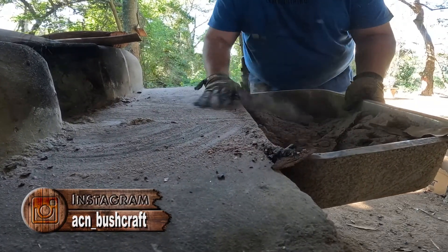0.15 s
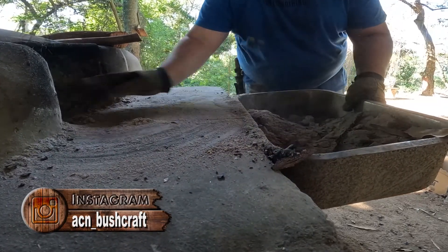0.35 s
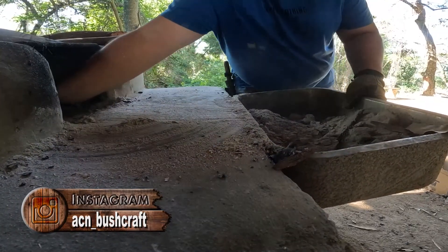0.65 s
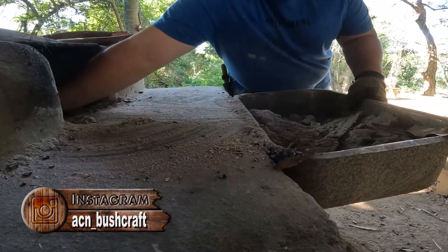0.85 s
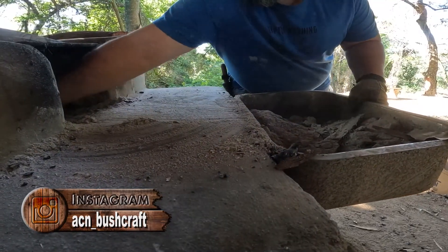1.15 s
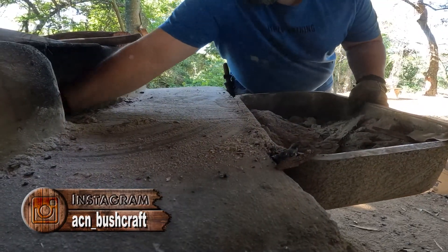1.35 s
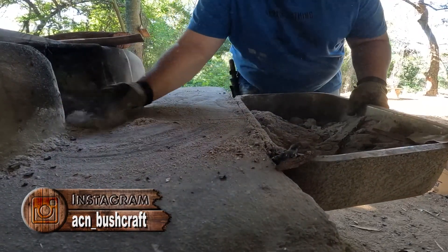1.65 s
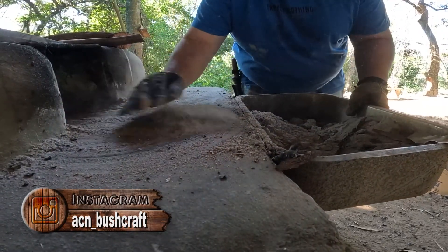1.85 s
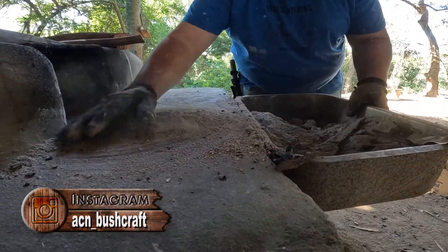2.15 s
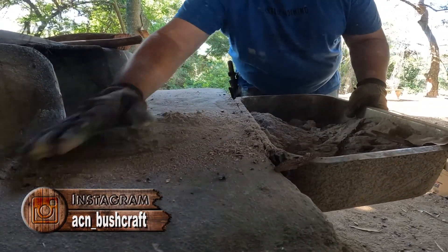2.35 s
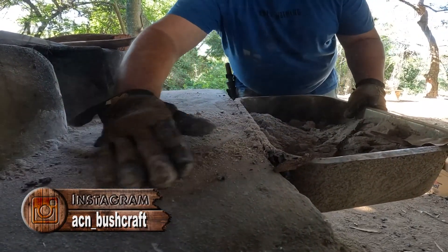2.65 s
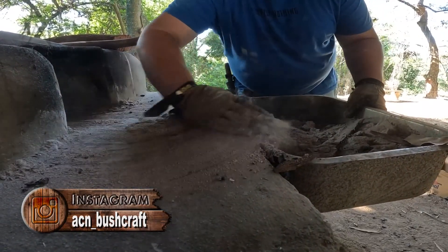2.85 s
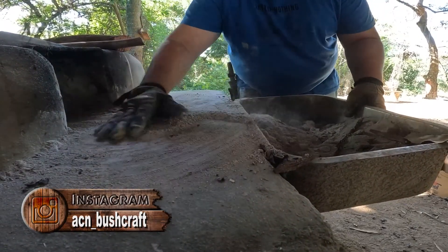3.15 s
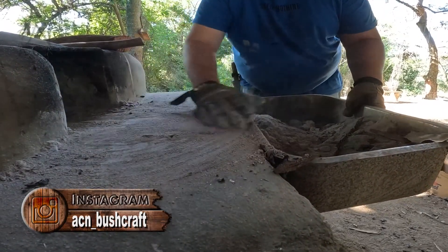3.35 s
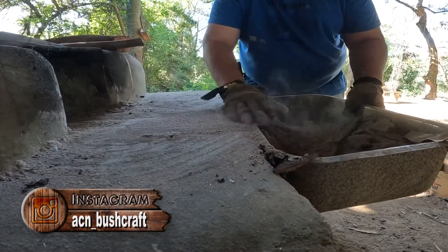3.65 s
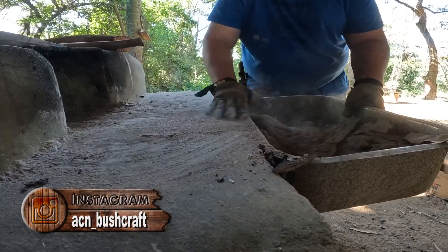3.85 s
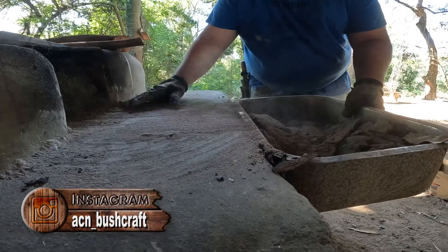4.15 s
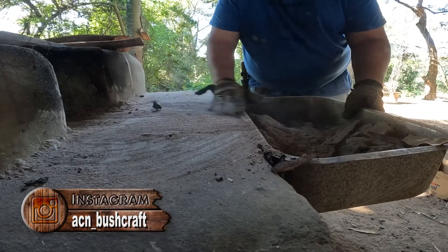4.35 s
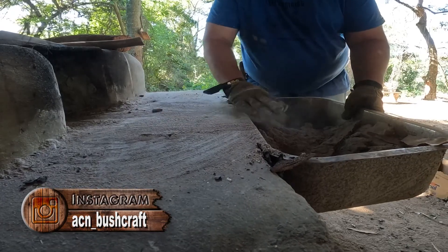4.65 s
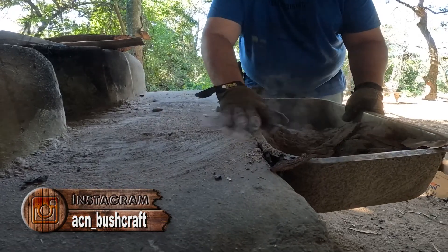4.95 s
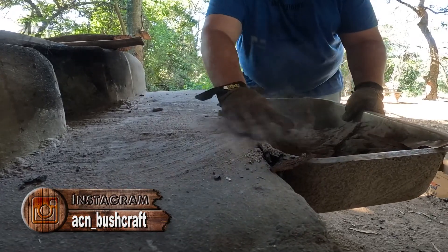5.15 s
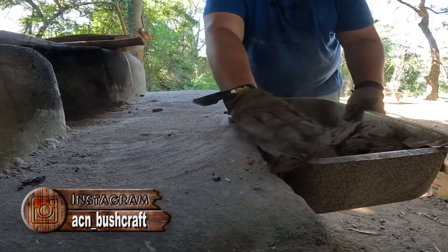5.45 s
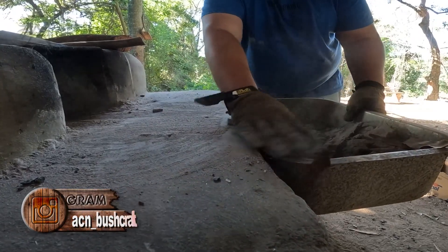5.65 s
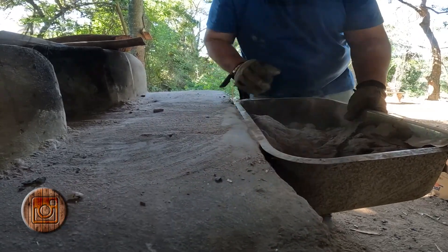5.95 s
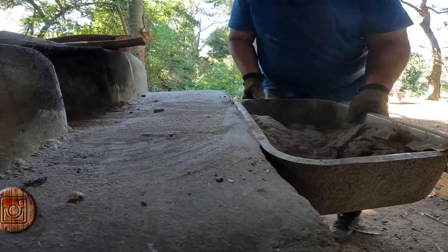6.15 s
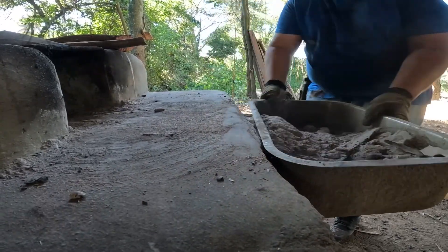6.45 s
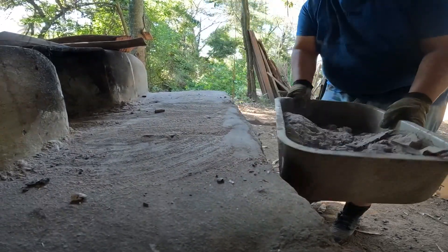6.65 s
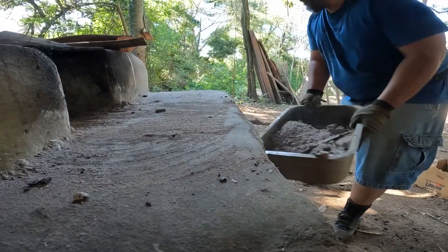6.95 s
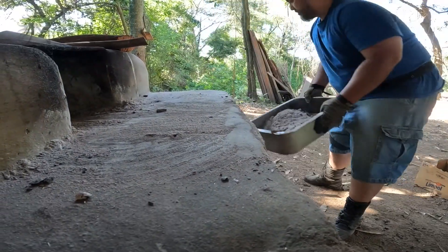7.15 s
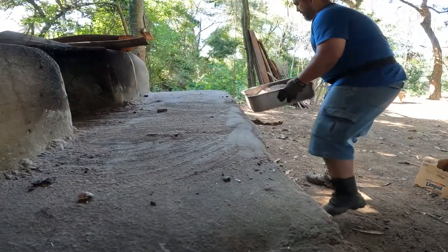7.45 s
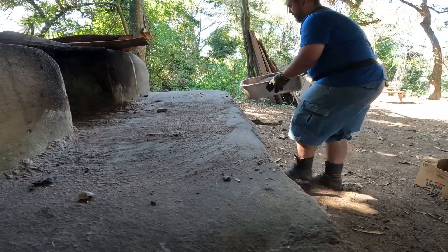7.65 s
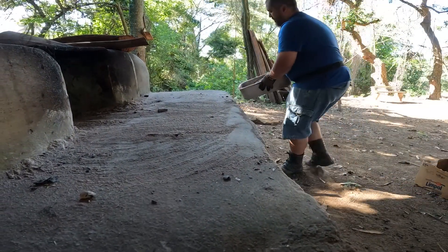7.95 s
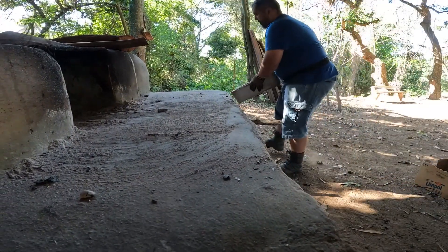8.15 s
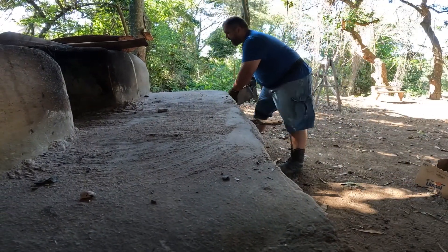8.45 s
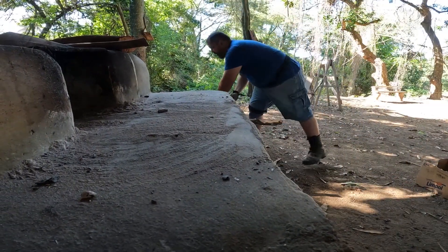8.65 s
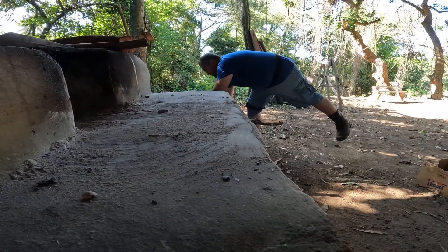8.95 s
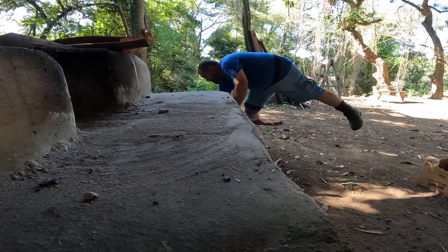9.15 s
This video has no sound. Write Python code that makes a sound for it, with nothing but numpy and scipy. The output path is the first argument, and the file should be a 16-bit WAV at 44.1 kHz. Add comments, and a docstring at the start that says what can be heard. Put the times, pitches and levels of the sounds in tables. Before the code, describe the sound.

Short dry rubs and crackling charcoal crumbs on a hearth, a low tray grind, faint footsteps on dirt, and a final crunchy thump.

```python
"""A gloved hand sweeps gritty ash across a hearth slab and scrapes more out of a clay stove, into a metal tray.
The tray drags off the slab with a rumble, is carried over crunching dirt and is set down with a thump.
Rubs are tiny random slips over a hiss; crumbs are short noise bursts; metal and thumps are fading tones.
Behind them are a low air rumble, leaves and a thin insect tone, made of filtered noise."""
import sys
import numpy as np
from scipy import signal
from scipy.fft import rfft, irfft, next_fast_len
from scipy.io import wavfile
from scipy.ndimage import uniform_filter1d, map_coordinates

SR = 44100
rng = np.random.default_rng(int(sys.argv[2]) if len(sys.argv) > 2 else 0)


def log_audio(samples):
    """Write samples as a 16-bit WAV file to the path given in sys.argv[1]."""
    # one column per channel
    frames = np.atleast_2d(samples).T
    # limit to full scale, then quantise
    limited = np.clip(frames, -1, 1)
    pcm = np.round(limited * 32767).astype(np.int16)
    wavfile.write(sys.argv[1], SR, pcm)


N = 410571

# sweeps over the slab: (time [s], rise [s], slide [s], sag [dB], friction [dB], hiss [dB], tray boom [dB],
# flat-hand resonance [Hz], flattest after [s])
SWEEP_STROKES = [ (0.018, 0.016, 0.061, 9, -21, -28, -64, 2230, .04),
                 (0.23, 0.019, 0.038, 9, -23.5, -26.5, -64, 2120, 0.03),
                 (1.754, 0.05, 0.085, 0, -22.5, -28.5, -52.5, 1820, 0.17),
                 (2.06, 0.047, 0.031, 0, -26, -31.5, -62, 1480, 0.0068),
                 (2.265, 0.034, 0.047, 0.5, -30, -34, -63, 1490, 0.08),
                 (2.48, 0.038, 0.099, 0, -23, -24.5, -55, 2080, .085),
                 (2.694, 0.0076, 0.045, 1.5, -39, -37.5, -70, 1650, .02),
                 (2.746, 0.015, 0.23, 9.5, -22, -24, -66, 1710, 0.077),
                 (3.236, 0.034, 0.073, 1, -28, -30.5, -61, 1350, .06),
                 (3.34, 0.034, 0.19, 8.5, -25, -26, -58, 2230, .06),
                 (3.729, 0.023, .06, 5.5, -30, -33, -47, 1590, 0.0063),
                 (3.954, 0.012, 0.067, 7, -22.5, -28, -40.5, 1830, 0.0061),
                 (4.255, 0.095, 0.052, -2.5, -33.5, -38.5, -79, 1500, 0.11),
                 (4.401, .008, 0.081, 7, -21.5, -27, -66, 2200, 0.024),
                 (4.48, 0.027, 0.069, -7, -42.5, -48, -52, 1420, .06),
                 (4.683, 0.0056, 0.053, 6, -25, -29, -44, 1600, 0.01),
                 (4.849, 0.013, 0.054, 5, -32.5, -35.5, -34.5, 1600, 0.025),
                 (4.97, 0.033, 0.011, -1, -51, -57, -51, 1370, .02),
                 (5.037, 0.0064, 0.023, 5.5, -30, -33.5, -36, 1330, .02),
                 (5.071, 0.0041, 0.035, 12.5, -25.5, -26.5, -38.5, 1300, 0.024),
                 (5.229, 0.026, 0.033, 7.5, -24, -28.5, -43, 1900, 0.012),
                 (5.43, 0.0097, 0.054, 2.5, -27, -29.5, -40.5, 1780, 0.0082),
                 (5.606, .02, 0.054, 3, -32.5, -35, -39, 1560, .01),
                 (5.789, 0.02, 0.028, -1.5, -32.5, -34, -46, 2400, 0.023), ]
# pulls inside the firebox: (time [s], rise [s], slide [s], sag [dB], friction [dB], hiss [dB], cavity boom [dB])
PULL_STROKES = [(0.478, 0.012, 0.4, 10, -31.5, -49, -48), (0.82, 0.075, 0.078, -0.5, -35, -48, -40),
                (0.95, 0.051, 0.099, 0, -37, -45.5, -37.5), (1.28, 0.057, .44, -4.5, -36.5, -45, -41)]
# the tray's rim grinding off the slab, then shifting in the hands:
# (time [s], rise [s], slide [s], sag [dB], grit [dB], tray boom [dB])
GRIND_STROKES = [(5.71, 0.087, .25, 1, -54, -34.5), (6.05, 0.062, 0.21, -4, -53.5, -34),
                 (6.149, 0.014, .012, 9, -40, -48), (6.232, .016, 0.061, 3.5, -37, -35),
                 (6.33, .026, .014, -5, -35.5, -36), (6.38, 0.0026, 0.045, -1, -21.5, -26),
                 (6.44, 0.061, 0.021, 5.5, -27.5, -28.5), (6.675, 0.022, 0.32, 9.5, -48.5, -51.5)]
# soles and clothes scuffing on the walk, then the tray settling in the dirt:
# (time [s], rise [s], slide [s], sag [dB], crunch [dB], swish [dB])
SCUFF_STROKES = [(7.04, 0.016, 0.25, 13, -64, -62.5), (7.45, 0.022, 0.16, 0.5, -57.5, -69),
                 (7.74, .012, .015, 4, -55, -74), (7.842, 0.012, .02, 3.5, -45, -51),
                 (7.973, 0.0086, 0.032, 2.5, -41.5, -57), (8.0, 0.058, 0.34, 17.5, -56.5, -51.5),
                 (8.42, 0.0075, .24, 1.5, -56, -62.5), (8.7, 0.13, .06, -2, -61.5, -60),
                 (8.885, 0.031, 0.17, 3.5, -46, -56.5), (9.158, 0.013, .02, 4, -38, -43),
                 (9.192, 0.014, .03, 10.5, -26, -33.5)]
# larger crumbs of charcoal cracking: (time [s], level [dB], pitch [Hz], spray of fragments [dB relative to snap])
LARGE_CRUMBS = [(0.028, -21, 1960, -11), (0.167, -38, 4400, -13), (0.227, -14.5, 1730, -25),
                (0.25, -15, 2000, -13), (0.36, -33.5, 1400, -25), (0.512, -14.5, 1690, -6),
                (0.607, -18, 1420, -2), (1.499, -16, 1400, 1), (1.575, -7.5, 1360, -14),
                (1.779, -16, 1230, -15), (1.929, -25.5, 2960, 2), (1.959, -30, 4700, -3),
                (1.982, -38.5, 2919, 0), (2.06, -23.5, 2200, -24), (2.292, -11.5, 1070, -11),
                (2.482, -26, 1550, -16), (2.506, -7, 1326, -4), (2.706, -21, 1870, -11),
                (3.112, -45, 1180, -11), (4.2, -41, 1690, -24), (4.407, -18, 2110, -15),
                (4.568, -14.5, 1490, -19), (4.715, -8.5, 1410, -10), (4.851, -7.5, 1630, -17),
                (5.076, -15, 1118, -13), (5.232, -8.5, 1614, -23), (5.258, -17, 2420, -7),
                (5.477, -10, 1400, -3), (5.535, -19, 1530, -4), (5.778, -15, 1376, -1),
                (6.034, -28, 2500, -20.5), (6.358, -10.5, 4630, 13), (6.382, -13, 1150, -16),
                (6.501, -11, 2230, -15), (6.586, -24, 1400, -4), (6.715, -31, 1010, 5),
                (6.776, -42, 1500, -8), (6.805, -23, 1170, -2), (6.911, -32.5, 1470, -9),
                (7.456, -30.5, 1260, -9), (7.55, -35, 1400, -8), (7.632, -41, 1400, -10),
                (7.861, -32, 1200, -20), (7.986, -32, 1090, -17), (8.079, -32, 1500, -10),
                (8.525, -34, 1820, -12)]
# hard knocks on the tray's rim: (time [s], level [dB])
RIM_KNOCKS = [(3.533, -10.5), (5.736, -16), (5.896, -34.5), (6.586, -27), (6.775, -28)]
# the tray's drops and the footfalls: (time [s], level [dB], base pitch [Hz])
SOFT_THUMPS = [(3.54, -32.5, 196), (3.794, -28, 212), (4.024, -27.5, 511), (4.862, -22, 139),
               (6.421, -9, 134), (6.585, -28.5, 514), (6.743, -24, 169), (7.471, -28.5, 216),
               (7.858, -26.5, 137), (7.994, -31.5, 205), (8.433, -36, 150), (8.526, -35.5, 188),
               (8.929, -32.5, 209), (9.161, -12, 192), (9.201, -13.5, 121)]

# how the support of the tray changes its floor: (time [s], lowest mode [Hz], second mode [dB relative to lowest])
TRAY_FLOOR_PITCH = [(3.8, 166, -3), (4.9, 140, -4), (5.75, 142, -8.5), (5.97, 163, -13),
                    (6.04, 140.5, -10.5), (6.12, 143, 3), (6.33, 146.7, -3), (6.43, 134.2, -5.5),
                    (6.6, 139.7, -6), (6.8, 166.2, 1)]
# ringing of the tray's wall: (pitch [Hz], width [Hz], level [relative dB])
TRAY_WALL_MODES = [(337, 22, -12.5), (468.5, 32, 3.5)]
# how freely rubs and knocks reach the wall: (time [s], share [0 to 1])
WALL_TOUCH = [(3.4, 1), (3.55, 1), (6.85, 1), (7, 0.32), (9.1, 0), (9.15, 0.24)]
# ringing of the tray's rim: (pitch [Hz], level [relative dB], time to fall 60 dB [s])
TRAY_RIM_MODES = [(990, -2.5, 0.099), (1174, 10, 0.024), (1200, 2, 0.056), (1560, -2, 0.043)]
# tones in a thump: (times the base pitch [ratio], level [relative dB])
THUMP_MODES = [(.74, -9.5), (1.01, 2.5), (1.7, -4.5)]

# colour of grit on the slab: (frequency [Hz], level [relative dB])
SLAB_COLOUR = [(88, -62), (150, -15.5), (350, -14.5), (480, -11), (750, -5), (1000, 2), (1500, 1.5),
               (2300, -6.5), (3000, 1), (3600, -4), (4700, -2.5), (7300, -9), (9000, -18.5), (12000, -20),
               (14600, -36)]
# colour of scraping in the firebox: (frequency [Hz], level [relative dB])
FIREBOX_COLOUR = [(53, -48), (90, -15), (144, -5), (245, -3), (310, -17), (367, -5.5), (575, -6.5),
                  (979, -3.5), (1700, -6.5), (3440, -14), (4260, -14), (7410, -19.5), (12100, -39),
                  (14600, -49)]
# colour of the grinding rim: (frequency [Hz], level [relative dB])
RIM_COLOUR = [(240, -21), (400, -3), (465, -2.5), (648, -3.5), (824, -4), (1260, 2), (1700, -2), (2300, 1),
              (4010, -6), (5260, -2), (8260, -13.5), (12000, -19.5), (14600, -34)]
# colour of crunching dirt: (frequency [Hz], level [relative dB])
DIRT_COLOUR = [(150, -3), (300, -4.5), (500, -12), (720, -21.5), (950, -3.5), (1400, -5.5), (2200, -8.5),
               (3400, -10.5), (5500, -8), (7500, -14.5), (9000, -24.5), (12000, -22), (14000, -38)]
# colour of the noise in the tray's boom: (frequency [Hz], level [relative dB])
BOOM_COLOUR = [(35, -25), (70, -4), (120, 0.5), (160, -2.5), (230, -1), (290, -7), (370, -21.5), (550, -35),
               (920, -94)]
# colour of the air rumble: (frequency [Hz], level [relative dB])
AIR_COLOUR = [(15, -10), (22, -1), (45, 0), (58, -3), (75, -17.5), (110, -17.5), (180, -20), (350, -26),
              (700, -45), (1500, -90)]
# colour of the leaves: (frequency [Hz], level [relative dB])
LEAF_COLOUR = [(350, -23), (600, -8), (856, -17.5), (1190, -5), (1630, -8), (2070, -10), (2770, -15.5),
               (4330, -15), (9060, -27.5), (12100, -30.5), (14000, -54.5)]
# colour of the air under the palm: (frequency [Hz], level [relative dB])
PALM_COLOUR = [(600, -6), (1000, 0.5), (2500, 3), (3600, -6), (8000, -33)]
# body left in the rub at each palm pitch: (hollow pitch [Hz], level [relative dB])
BODY_BY_PITCH = [(1350, 0.0), (1650, -5.0), (2000, -1.5)]
# how much of the rub is the palm's hollow tone: (hollow pitch [Hz], share of power [0 to 1])
HOLLOW_SHARE = [(1300, 0.2), (1700, 0.4), (2050, 0.79)]

# where the work is: (time [s], left minus right above the bass [dB])
LEFT_LEAN = [(0, 0.3), (.7, 1.5), (1.7, 1), (2.2, 3), (2.8, 0.4), (3.3, 2), (3.8, -0.7), (4.4, 0.3),
             (5.3, -2), (6.4, -1.5), (7.5, -2.5), (9.3, 1.5)]
# how alike left and right are, for close sounds: (frequency [Hz], likeness [0 to 1])
CLOSE_ALIKE = [(150, 0.98), (1000, 0.92), (4000, 0.81), (8000, 0.94), (12000, 0.6)]
# the same for the air, then for the leaves: (frequency [Hz], likeness [0 to 1])
AIR_ALIKE = [(30, 0.67), (100, 0.74)]
LEAF_ALIKE = [(1000, 0.51), (8000, 0.6)]
# fading of the echo under the roof: (frequency [Hz], time to fall 60 dB [s])
SHELTER_FADE = [(150, 0.8), (1500, 0.2), (6000, 0.15), (13000, 0.05)]
# low rumble of the open air, before its random wobble: (time [s], level [dB])
AIR_LEVEL = [(0, -45), (1, -47.5), (2.8, -51), (4.7, -52.5), (6.3, -49.5), (7.5, -47.5), (8.3, -52),
             (9.3, -48.5)]
# rustle of the leaves, before its random wobble: (time [s], level [dB])
LEAF_LEVEL = [(0, -60), (4.2, -62.5), (5.5, -58), (9.3, -61)]
# lift of the left treble, matched by an equal cut on the right: (frequency [Hz], lift [dB])
LEFT_TREBLE = [(4000, 0.04), (8000, 1.0)]

TOP_HZ = 14500
TOUCH_DB = 18  # every rub starts this far under its full pressure
SAG_POWER = 1.34  # pressure holds at first and sags towards the end of the slide
# fall after the hand lifts: friction, hiss, tray boom
LIFT_DB_PER_S, POWDER_DB_PER_S, TRAY_DB_PER_S = 601, 703, 180
# fall after a pull, a grind, a scuff
FIREBOX_DB_PER_S, GRIND_DB_PER_S, DIRT_DB_PER_S = 264, 454, 223
CUPPED_HZ = 1255  # hollow under a cupped hand
FLAT_S, FLAT_SHARE = 0.054, 0.31  # width of the flat moment: a fixed time plus a share of the slide
# small crumbs: how many, level against the rubbing, random spread each way, middle pitch
CRUMBS_PER_S, CRUMB_DB, CRUMB_SPREAD_DB, CRUMB_HZ = 28, 1, 4, 1900
SECOND_MODE = 1.45  # times the tray floor's lowest mode


def sweeps():
    """The glove rubs grit over the slab; the hollow under the palm rings higher and clearer as the hand flattens."""
    gain, hiss_gain = strokes(SWEEP_STROKES, [LIFT_DB_PER_S, POWDER_DB_PER_S])
    hollow_hz = hollow_pitch()
    low, hiss = split(grit(SLAB_COLOUR, rate=3200, powder_db=0, clump_db=1.67), 2920)
    body, rasp = split(unit(low), 1060)
    rasp = rasp + amp(along(BODY_BY_PITCH, hollow_hz)) * body
    # the rasp bounces between glove and slab
    rasp = echoed(rasp, 2 / np.maximum(hollow_hz, 1000), reflect=0.19)
    hollow = unit(palm(noise(PALM_COLOUR, CLOSE_ALIKE), hollow_hz, width_hz=450))
    share = np.clip(along(HOLLOW_SHARE, hollow_hz), 0, 1)
    rub = np.sqrt(1 - share) * rasp + np.sqrt(share) * hollow
    return shifting(gain * rub + hiss_gain * unit(hiss), depth_db=2.5)


def hollow_pitch():
    """The hollow under the palm rises in pitch as the hand flattens, once in each sweep."""
    t = np.linspace(0, N / SR, N // 100)
    hz = np.full(len(t), float(CUPPED_HZ))
    for s, _, slide_s, *_, flat_hz, after_s in SWEEP_STROKES:
        flatness = np.exp(-((t - s - after_s) / (FLAT_S + FLAT_SHARE * slide_s)) ** 2)
        hz = np.where(t < s, hz, CUPPED_HZ + (flat_hz - CUPPED_HZ) * flatness)
    return np.interp(np.arange(N) / SR, t, uniform_filter1d(hz, size=4))


def palm(x, hz, width_hz):
    """A moving air resonance: cross-fade between neighbouring fixed ones."""
    centres = np.geomspace(900, 2900, 7)
    place = np.interp(hz, centres, np.arange(len(centres)))
    out = 0
    for k, centre in enumerate(centres):
        nearness = np.maximum(1 - abs(place - k), 0)
        out = out + nearness * signal.lfilter(*signal.iirpeak(centre, centre / width_hz, SR), x)
    return out


def pulls():
    """Deep in the firebox the scraping is dull and uneven, and the cavity booms."""
    low, hiss = split(grit(FIREBOX_COLOUR, rate=1500, powder_db=2.0, clump_db=1.3), 2630)
    boom, rasp = split(low, 940)
    rasp_gain, hiss_gain, boom_gain = strokes(PULL_STROKES, [FIREBOX_DB_PER_S] * 3)
    scrape = rasp_gain * unit(rasp) + hiss_gain * unit(hiss) + boom_gain * unit(boom)
    return shifting(amp(1.05 * wobble(55)) * scrape, depth_db=2.2)


def crumbs():
    """Each crumb breaks with a sharp snap and a short spray of fragments."""
    out, t = np.zeros(N), np.arange(SR // 12) / SR
    for s, db, hz, spray_db in LARGE_CRUMBS + small_crumbs():
        fade = amp(-60 * t / 0.0086) + amp(spray_db - 60 * t / 0.081)
        burst = rng.standard_normal(len(t)) * fade
        band = [hz * 0.64, min(hz * 1.53, SR / 3)]
        snap = signal.lfilter(*signal.butter(1, band, "band", fs=SR), burst)
        add(out, s, amp(db - 4.0) * snap / abs(snap).max())
    return signal.lfilter(*signal.butter(2, [600, 8000], "band", fs=SR), out)


def small_crumbs():
    """Small crumbs break at random under glove, rim and soles, louder with harder rubbing: rows like LARGE_CRUMBS."""
    rubbing = strokes(SWEEP_STROKES, [LIFT_DB_PER_S])[0]
    rubbing = rubbing + strokes(PULL_STROKES + GRIND_STROKES + SCUFF_STROKES, [DIRT_DB_PER_S])[0]
    rows = []
    for when, size, pitch in rng.random((int(CRUMBS_PER_S * N / SR), 3)):
        rubbing_db = 20 * np.log10(rubbing[int(when * N)] + 1e-6)
        db = rubbing_db + CRUMB_DB + CRUMB_SPREAD_DB * (2 * size - 1)
        hz = CRUMB_HZ * 2 ** (2 * pitch - 1)  # up to an octave either way
        rows.append((when * N / SR, db, hz, -16))
    return rows


def tray():
    """The ash-damped tray floor judders around its two lowest modes, shaken by the hand and its grinding rim."""
    hz, second_db = curves(TRAY_FLOOR_PITCH)
    phase = 2 * np.pi * np.cumsum(hz) / SR
    mode = lambda p: wobble(38) * np.cos(p) + wobble(38) * np.sin(p)
    judder = unit(mode(phase) + amp(second_db) * mode(SECOND_MODE * phase))
    brushed = strokes(SWEEP_STROKES, [LIFT_DB_PER_S, POWDER_DB_PER_S, TRAY_DB_PER_S])[-1]
    grinding, dragged = strokes(GRIND_STROKES, [GRIND_DB_PER_S, TRAY_DB_PER_S])
    shaking = np.hypot(brushed, dragged)
    boom = shaking * (amp(-2.0) * judder + amp(-5) * noise(BOOM_COLOUR, CLOSE_ALIKE))
    return boom + grinding * grit(RIM_COLOUR, rate=1100, powder_db=3, clump_db=2.05)


def clinks():
    """A gritty knock sets the tray's rim ringing briefly."""
    out, t = np.zeros(N), np.arange(SR // 5) / SR
    for s, db in RIM_KNOCKS:
        ring = 0
        for hz, mode_db, t60 in TRAY_RIM_MODES:
            ring = ring + amp(mode_db + rng.normal(0, 2.1) - 60 * t / t60) * np.sin(2 * np.pi * hz * t)
        crunch_filter = signal.butter(1, [700, 2500], "band", fs=SR)
        crunch = signal.lfilter(*crunch_filter, rng.standard_normal(len(t)))
        knock = ring + amp(-7.5 - 60 * t / 0.26) * crunch
        add(out, s, amp(db - 8) * knock * (1 - np.exp(-t / 0.0035)))
    return out


def wall(x):
    """The tray's wall rings while it rests on the slab, less and less once lifted, and again when it lands."""
    touching = curves(WALL_TOUCH)[0]
    ringing = lambda f: sum(amp(db + 7) * resonance(f, hz, width) for hz, width, db in TRAY_WALL_MODES)
    return filtered(x * touching, ringing)


def thumps():
    """Heavy soft contacts: a few strongly damped low modes and a dull rattle."""
    out, t = np.zeros(N), np.arange(SR // 3) / SR
    for s, db, hz in SOFT_THUMPS:
        body = 0
        for ratio, mode_db in THUMP_MODES:
            mode_hz = hz * ratio * rng.normal(1, 0.02)
            body = body + amp(mode_db) * np.sin(2 * np.pi * mode_hz * t)
        rattle_filter = signal.butter(2, [hz * 0.83, hz * 4], "band", fs=SR)
        rattle = unit(signal.lfilter(*rattle_filter, rng.standard_normal(len(t))))
        thud = body * amp(-60 * t / 0.12) + amp(-14 - 60 * t / 0.35) * rattle
        thud = thud * (1 - np.exp(-t / 0.003))  # soft start
        add(out, s, amp(db - 6.5) * thud / abs(thud).max())
    return out


def scuffs():
    """Dry dirt crunches under the soles and the landing tray; dust and cloth swish above it."""
    crunch, swish = split(grit(DIRT_COLOUR, rate=500, powder_db=1.5, clump_db=0.7), 2780)
    crunch_gain, swish_gain = strokes(SCUFF_STROKES, [DIRT_DB_PER_S] * 2)
    return crunch_gain * unit(crunch) + swish_gain * unit(swish)


def shelter(x):
    """The roof and stove walls answer with a short weak tail of fading noise."""
    hz, t, z = signal.stft(rng.standard_normal((2, SR // 2)), SR, nperseg=256)
    fade = amp(-60 * t / along(SHELTER_FADE, hz)[:, None])
    tail = signal.istft(z * fade, SR, nperseg=256)[1]
    tail = np.pad(tail, ((0, 0), (SR // 250, 0)))  # the answer comes 4 ms late
    return signal.fftconvolve(x.mean(axis=0)[None], tail / np.linalg.norm(tail[0]), axes=1)[:, :N]


def outdoors():
    """Low moving air and leaves are wavering coloured noise; the insect chorus is noise in a narrow band."""
    air = amp(curves(AIR_LEVEL)[0] + 2.1 * wobble(8.4)) * noise(AIR_COLOUR, AIR_ALIKE)
    leaves = amp(curves(LEAF_LEVEL)[0] + wobble(7.3)) * noise(LEAF_COLOUR, LEAF_ALIKE)
    insects = unit(filtered(rng.standard_normal((2, N)), lambda f: resonance(f, 4320, 330) ** 2))
    return air + leaves + amp(-67.5 + wobble(3.53)) * insects


def grit(spectrum, rate, powder_db, clump_db):
    """Friction: tiny slips of hard grains over a hiss of powder, bunched as the surface catches and lets go."""
    slips = (rng.random((2, N)) < rate / SR) * rng.uniform(-1.06, 1, (2, N))  # rate is slips a second
    force = unit(slips) + amp(powder_db) * rng.standard_normal((2, N))
    bunching = amp(clump_db * (wobble(260) + 0.65 * wobble(60)))
    return stereo(force * bunching, spectrum, CLOSE_ALIKE)


def strokes(table, falls_db_per_s):
    """A rub presses in, sags as it slides and dies away when it lifts: one gain curve for each level column."""
    power = np.zeros((len(falls_db_per_s), N))
    for s, rise_s, slide_s, sag_db, *levels_db in table:
        t = np.arange(int((rise_s + slide_s + .5) * SR)) / SR
        press_db = -TOUCH_DB * np.maximum(1 - t / rise_s, 0)
        slid = np.clip((t - rise_s) / slide_s, 0, 1)
        pressure_db = press_db - sag_db * slid ** SAG_POWER
        lifted_s = np.maximum(t - rise_s - slide_s, 0)
        fade_in = np.minimum(t / 0.0011, 1)
        for layer, db, fall in zip(power, levels_db, falls_db_per_s):
            add(layer, s, (amp(db + pressure_db - fall * lifted_s) * fade_in) ** 2)
    return np.sqrt(power)


def shifting(x, depth_db):
    """The gaps between the fingers keep changing, and with them the peaks of the colour."""
    z = signal.stft(x, nperseg=512)[2]
    field = uniform_filter1d(rng.standard_normal(z.shape[1:]), size=4, axis=0)  # smooth over pitch
    field = uniform_filter1d(field, size=12, axis=1)  # smooth over time
    return signal.istft(z * amp(depth_db * unit(field) - depth_db / 10), nperseg=512)[1][:, :N]


def echoed(x, delay, reflect):
    """x with one near reflection, delay seconds late: a moving comb of peaks and dips."""
    n = np.arange(N)
    late = np.array([np.interp(n - delay * SR, n, channel) for channel in x])
    return (x + reflect * late) / np.sqrt(1 + reflect ** 2)


def placed(x):
    """A source further right is slightly later in the left channel and, above the bass, weaker there."""
    lean = curves(LEFT_LEAN)[0] / 2
    lag = .55 - 0.22 * lean  # samples
    left = map_coordinates(x[0], [np.arange(N) - lag], mode="nearest")
    bass, rest = split(np.array([left, x[1]]), 350)
    return bass + rest * amp([lean, -lean])


def noise(spectrum, alike):
    """Smooth coloured stereo noise."""
    return stereo(rng.standard_normal((2, N)), spectrum, alike)


def stereo(pair, spectrum, alike):
    """Two unrelated signals become a coloured, partly alike left and right of rms 1."""
    turn = lambda f: np.arccos(np.clip(along(alike, f), -1, 1)) / 2
    colour = lambda f: amp(along(spectrum, f)) * np.array([np.cos(turn(f)), np.sin(turn(f))])
    mid, side = filtered(pair, colour)
    return unit(np.array([mid + side, mid - side]))


def split(x, hz):
    """The parts of x below and above hz."""
    low = filtered(x, lambda f: 1 / (1 + (f / hz) ** 8))
    return low, x - low


def filtered(x, response):
    """x times a response of frequency."""
    m = next_fast_len(N + 8192, real=True)
    return irfft(rfft(x, m) * response(np.fft.rfftfreq(m, 1 / SR)), m)[..., :N]


def resonance(f, hz, width_hz):
    """Response of one damped mode."""
    return 1j * f * width_hz / (hz * hz - f * f + 1j * f * width_hz)


def wobble(rate):
    """A smooth random curve, rate knots a second."""
    fine = signal.resample_poly(rng.standard_normal(int(N * rate / SR) + 4), 10, 1)
    return 1.26 * np.interp(np.arange(N) * 10 * rate / SR, np.arange(len(fine)), fine)


def curves(rows):
    """One value per sample for each column after the time."""
    s, *cols = np.transpose(rows)
    return [np.interp(np.arange(N) / SR, s, c) for c in cols]


def along(points, hz):
    """Reads a table of (frequency [Hz], value) between its points, on a log axis."""
    f, v = np.transpose(points)
    return np.interp(np.log(hz + 1), np.log(f + 1), v)


def add(track, s, sound):
    """Mix a sound in at s seconds."""
    part = track[max(round(s * SR), 0):][:len(sound)]
    part += sound[:len(part)]


def amp(db):
    """Decibels to gain."""
    return 10 ** (np.asarray(db) / 20)


def unit(x):
    """Scaled to rms 1."""
    return x / np.sqrt(np.mean(x ** 2) + 1e-20)


def scene():
    """All the work, placed between left and right, under the roof, with the outdoors behind."""
    contacts = sweeps() + tray() + scuffs() + crumbs() + clinks() + thumps()
    work = pulls() + contacts + wall(contacts)
    return placed(work) + amp(-27.5) * shelter(work) + outdoors()


def record(dry):
    """The left channel is a little brighter than the right; nothing is kept from TOP_HZ upwards."""
    brighter = lambda f: amp(np.outer([1, -1], along(LEFT_TREBLE, f)))
    return filtered(dry, lambda f: brighter(f) * (f < TOP_HZ))


dry = scene()
out = record(dry)
log_audio(out)
```